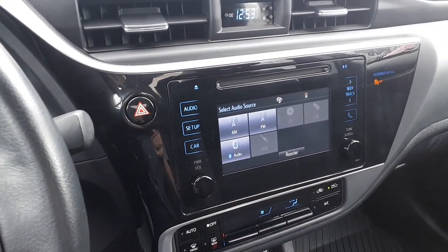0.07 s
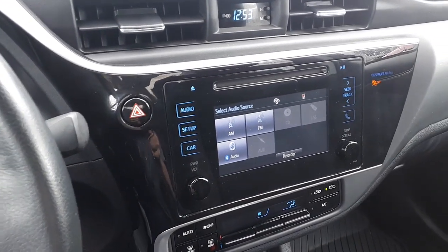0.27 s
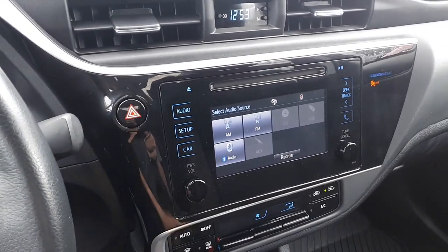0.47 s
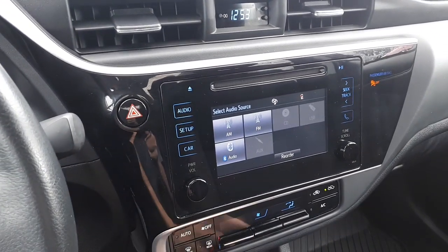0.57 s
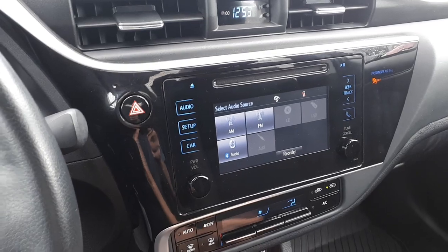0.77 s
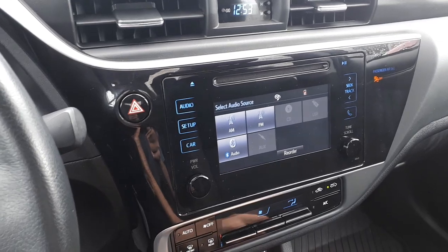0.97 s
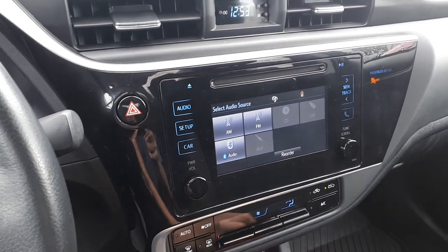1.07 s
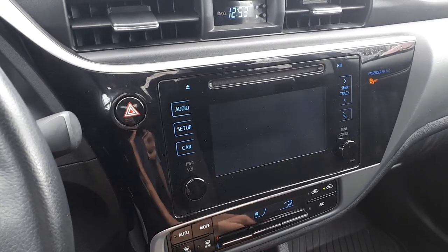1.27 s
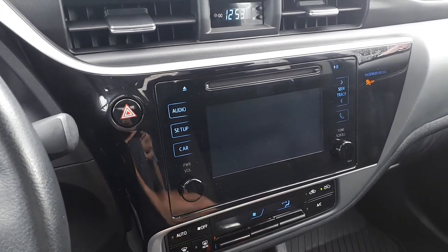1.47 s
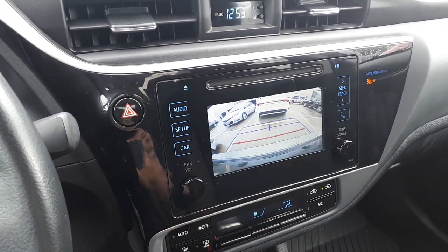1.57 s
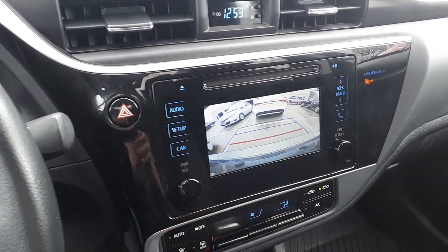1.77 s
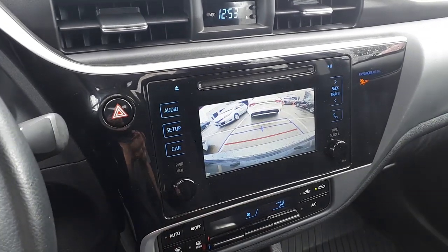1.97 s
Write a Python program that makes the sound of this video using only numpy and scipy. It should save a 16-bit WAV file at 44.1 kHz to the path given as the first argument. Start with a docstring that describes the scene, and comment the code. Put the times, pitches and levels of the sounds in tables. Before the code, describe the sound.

A car gear lever is shifted in a small dry cabin, heard close in stereo over a faint, muffled engine idle. A slight swish and soft hand thump come around 0.6 seconds, a sharp click at 0.8, then uneven plastic scraping. A heavy clunk at 1.07 runs into a clatter and loud bright snap at 1.2. Small knocks and knob ticks near 1.35 follow, with a fading low shudder.

```python
"""Inside a parked car the engine idles as muffled noise, wavering tones, a pulsing whirr and a tone that dies away.
An arm reaches for the gear lever as a noise swish; the hand lands on it, the loose knob ticks and a first sharp
click has a bright treble edge. The lever leaves its notch with a thud and scrapes along the gate in uneven noise
and gliding squeaks; it drops into the next notch, the latch snaps home and the linkage settles over a low shudder.
Each contact strikes console, housing, detent and latch, built from decaying modes and dense noise bursts."""
import sys
import numpy as np
from scipy import signal
from scipy.fft import rfft, irfft, next_fast_len
from scipy.io import wavfile
from scipy.ndimage import map_coordinates

SR = 44100
rng = np.random.default_rng(int(sys.argv[2]) if len(sys.argv) > 2 else 0)


def transcribe(u):
    """Save the signal u as a 16-bit wav file named by the first command-line argument.

    u: samples, shape (n,) or (channels, n), limited to [-1, 1]; the rate is SR.
    q: integer samples, one column per channel.
    """
    v = np.clip(np.atleast_2d(u).T, -1, 1)
    q = np.round(v * 32767).astype(np.int16)
    wavfile.write(sys.argv[1], SR, q)


N = 89567  # length in samples


def amp(db):
    """Decibels to linear gain."""
    return 10 ** (np.asarray(db) / 20)


def unit(x):
    """Scale a sound to rms 1."""
    return x / np.sqrt(np.mean(x ** 2) + 1e-20)


def along(points, hz):
    """Read a curve of (frequency, value) points, interpolated on a log frequency axis."""
    f, v = np.transpose(points)
    return np.interp(np.log(hz + 1), np.log(f + 1), v)


def wobble(rate):
    """A smooth random curve with rate knots a second."""
    knots = rng.standard_normal(1024)
    return map_coordinates(knots, [np.arange(N) * rate / SR], mode="wrap")


# how alike left and right are, from near mono in the bass to slightly opposed on top:
# frequency_hz, correlation (1 = identical)
LIKENESS = [(50, 0.99), (300, 0.8), (600, 0.52), (1100, 0.18), (2500, 0), (15000, -0.27)]


def noise(colour, size):
    """Coloured stereo noise of rms 1, whose mid and side mix sets the left-right likeness."""
    hz = np.fft.rfftfreq(size, 1 / SR)
    turn = np.arccos(np.clip(along(LIKENESS, hz), -1, 1)) / 2
    phases = np.exp(2j * np.pi * rng.random((2, len(hz))))
    spread = [np.cos(turn), np.sin(turn)]
    mid, side = irfft(phases * amp(along(colour, hz)) * spread, size)
    return unit(np.array([mid + side, mid - side]))


def fade(t, attack_s, t60):
    """A quick rise times an exponential decay that loses 60 dB in t60 seconds."""
    return (1 - np.exp(-t / attack_s)) * np.exp(-np.log(1000) * t / t60)


def add(out, s, sound):
    """Mix a sound in at time s."""
    start = round(s * SR)
    out[:, start:start + sound.shape[1]] += sound[:, :N - start]


def ring(t, modes, attack_s, scatter):
    """Decaying modes of a part; scatter (radians) sets how differently they reach the two microphones."""
    phases = scatter * rng.standard_normal((len(modes), 2, 1))
    total = 0
    for (hz, db, t60), phase in zip(modes, phases):
        total = total + amp(db) * fade(t, attack_s, t60) * np.sin(2 * np.pi * hz * t + phase)
    return total / np.sqrt(sum(amp(db) ** 2 for _, db, _ in modes) / 2)


CABIN_T60, CABIN_RISE_S = 0.067, 0.013


def burst(t, colour, attack_s, t60, cabin_db):
    """Countless close modes dying together as noise, with the cabin's weaker, slower-rising tail."""
    direct = fade(t, attack_s, t60)
    tail = amp(cabin_db) * fade(t, CABIN_RISE_S, CABIN_T60)
    return noise(colour, len(t)) * np.hypot(direct, tail)


def filtered(x, response):
    """Shape x by a response of frequency, padded so that the end does not wrap onto the start."""
    m = next_fast_len(N + SR // 2)
    return irfft(rfft(x, m) * response(np.fft.rfftfreq(m, 1 / SR)), m)[..., :N]


# spectrum of the idle noise: frequency_hz, level_db
IDLE_COLOUR = [(15, -49.5), (25, -17.5), (64, -7.5), (97, -8), (130, -1), (180, -15), (223, -14.5),
               (309, -13), (335, -23), (550, -26), (840, -24), (911, -32), (1230, -41.5), (2050, -41),
               (3080, -47), (16000, -50)]
# steady engine and fan tones: pitch_hz, level_db
HUM_TONES = [(129.2, -69), (231.5, -72), (304, -70.5), (840, -76.5)]
IDLE_DB = -53.5
WHIRR_HZ, WHIRR_DB, WHIRR_DEPTH, TURNS_PER_S = 855, -74.5, .5, 12
FREE_HZ, FREE_DB, ENGAGE_S = 512, -68, 1.2  # the tone is gone when the gear engages


def idle():
    """The muffled engine and fan: rumble, wavering tones, a whirr pulsing once a turn and a dying tone."""
    t = np.arange(N) / SR
    tones = 0
    for hz, db in HUM_TONES:
        level = amp(db + 0.7 * wobble(1.6)) * np.sqrt(2)
        tones = tones + level * np.sin(2 * np.pi * hz * t + 0.37 * wobble(36))
    band = noise([(WHIRR_HZ / 2, -60), (WHIRR_HZ * .9, -12), (WHIRR_HZ, 0),
                  (WHIRR_HZ * 1.2, -40), (WHIRR_HZ * 2, -80)], N)
    pulse = 1 + WHIRR_DEPTH * np.sin(2 * np.pi * TURNS_PER_S * t + 2.1 * wobble(3.2))
    whirr = amp(WHIRR_DB) * pulse * band
    dying = np.sqrt(np.clip(1 - (t / ENGAGE_S) ** 2, 0, 1))
    free = amp(FREE_DB) * dying * np.sin(2 * np.pi * FREE_HZ * t + wobble(4.3))
    return amp(IDLE_DB) * noise(IDLE_COLOUR, N) + tones + free + whirr


# dense ring of the console, also used for the lever's thuds: frequency_hz, level_db
THUD_SPECTRUM = [(40, -16.5), (75, -9.5), (125, -5.5), (180, -9.5), (300, -5), (420, -18.5), (700, -27.5),
                 (2000, -51.5)]
SHUDDER_S, SHUDDER_RISE_S, SHUDDER_T60 = 1.1, 0.13, 0.74
SHUDDER_DB = -26.5  # before the rise and decay


def shudder():
    """The console goes on rumbling as the linkage settles: low noise that swells and decays."""
    t = np.maximum(np.arange(N) / SR - SHUDDER_S, 0)
    return amp(SHUDDER_DB) * fade(t, SHUDDER_RISE_S, SHUDDER_T60) * noise(THUD_SPECTRUM, N)


# spectrum of the sleeve's swish: frequency_hz, level_db
SLEEVE_SPECTRUM = [(500, 10), (2000, 4.5), (4000, 0.5), (6800, 8), (9000, 1.5)]
SLEEVE_S, SLEEVE_WIDTH_S, SLEEVE_DB = 0.56, 0.13, -63  # peak time, half-width at 1/e, peak level


def sleeve():
    """A soft noise swish swells and fades as the arm slides toward the lever."""
    swell = np.exp(-((np.arange(N) / SR - SLEEVE_S) / SLEEVE_WIDTH_S) ** 2)
    return amp(SLEEVE_DB) * swell * noise(SLEEVE_SPECTRUM, N)


# rubbing of the grip and the mechanism, a level curve: time_s, level_db
RUB_LEVEL = [(0.631, -92), (0.65, -56), (0.672, -70.5), (0.794, -51.5), (0.86, -46.5), (.92, -68),
             (0.998, -71), (1.04, -49), (1.1, -45), (1.144, -42.5), (1.185, -60), (1.251, -64)]
# spectrum of the rubbing: frequency_hz, level_db
RUB_SPECTRUM = [(100, -9.5), (300, 8), (800, -0.5), (1500, -10.5), (3500, -17), (9000, -31)]
# brief squeaks and rings of the plastic under load: start_s, length_s, pitch_hz, level_db
PLASTIC_SQUEAKS = [(1.0588, 0.025, 1029, -32), (1.063, 0.016, 7450, -44.5), (1.257, 0.042, 1730, -55)]
SQUEAK_RISE_HZ_PER_S, SQUEAK_JITTER, SQUEAK_ROUGH_DB = 1800, .035, 4  # jitter as a fraction of pitch


def scrape():
    """Plastic rubs unevenly along the gate and gives brief, rough squeaks with a rising glide."""
    level_db = np.interp(np.arange(N) / SR, *np.transpose(RUB_LEVEL), left=-120, right=-120)
    out = amp(level_db + 2.8 * wobble(170)) * noise(RUB_SPECTRUM, N)
    for s, length, hz, db in PLASTIC_SQUEAKS:
        count = int(length * SR)
        slip = np.array([wobble(1000) for _ in range(2)])[:, :count]  # each side slips on its own
        glide = SQUEAK_RISE_HZ_PER_S * (np.arange(count) / SR - length / 2)
        pitch = hz * (1 + SQUEAK_JITTER * slip) + glide
        swell = np.sin(np.pi * np.arange(count) / count)
        level = amp(db + SQUEAK_ROUGH_DB * wobble(520)[:count]) * swell
        add(out, s, level * np.sqrt(2) * np.sin(2 * np.pi * np.cumsum(pitch, axis=1) / SR))
    return out


# bright, dry treble edge of the first sharp click: start_s, level_db
CLICK_EDGES = [(0.8147, -35.5)]
# spectrum of the edge: frequency_hz, level_db
EDGE_SPECTRUM = [(5000, -34), (10000, -11), (13500, -1), (16000, 6.5)]


def click_edge():
    """The bright, dry treble edge of the first sharp click: a noise burst with a faint cabin tail."""
    out, t = np.zeros((2, N)), np.arange(SR // 2) / SR
    for s, db in CLICK_EDGES:
        add(out, s, amp(db) * burst(t, EDGE_SPECTRUM, attack_s=0.00045, t60=0.078, cabin_db=-29))
    return out


# ticks of the loose knob: start_s, level_db
KNOB_TICKS = [(0.746, -75), (1.3597, -49.5), (1.376, -61), (1.65, -74)]
# modes of the knob: pitch_hz, level_db
KNOB_MODES = [(1700, -3), (2170, -3), (2520, 2), (3430, -5), (4150, -5)]
# dense ring of the detent, also used for the knob: frequency_hz, level_db
CLACK_SPECTRUM = [(600, -25), (1400, -3.5), (2500, -2.5), (3600, -5.5), (5000, -14.5), (7400, -17.5),
                  (8200, -31), (16000, -44)]
KNOB_T60 = 0.096  # s


def rattle():
    """The loose plastic knob ticks and rings, dulled, under the hand and as the lever comes to rest."""
    out, t = np.zeros((2, N)), np.arange(SR // 2) / SR
    knob = [(hz, db, KNOB_T60) for hz, db in KNOB_MODES]
    dull = signal.butter(6, 4700, fs=SR, output="sos")
    for s, db in KNOB_TICKS:
        tick = (ring(t, knob, attack_s=0.00082, scatter=0.62)
                + burst(t, CLACK_SPECTRUM, attack_s=0.00087, t60=KNOB_T60, cabin_db=-45))
        add(out, s, amp(db) * tick)
    return signal.sosfilt(dull, out)


# contacts of the mechanism, with the console's thud, the housing's knock, the detent's clack and
# the latch's snap: start_s, thud_level_db, knock_level_db, clack_level_db, snap_level_db
LEVER_CONTACTS = [ (0.655, -27, -52, -84, -74), (0.8131, -28.5, -36.5, -45, -38),
                  (0.835, -37.5, -45, -59, -59), (1.004, -31.5, -47, -48, -61),
                  (1.0603, -48.5, -33, -33, -39.5), (1.0696, -12.5, -25, -32.5, -52),
                  (1.079, -23, -34, -52, -58), (1.097, -31, -54.5, -56.5, -69),
                  (1.1115, -52.5, -48, -43, -50), (1.154, -36, -25, -32.5, -53),
                  (1.18, -23.5, -32.5, -40, -60.5), (1.196, -33.5, -27.5, -22, -21.5),
                  (1.2008, -36.5, -26.5, -28, -19.5), (1.212, -27.5, -23, -27, -54),
                  (1.225, -25, -34, -47.5, -64), (1.33, -34, -47.5, -79, -58.5),
                  (1.358, -56.5, -40, -72.5, -57.5), (1.388, -36, -48.5, -66, -69)]
# modes of the console: pitch_hz, level_db, t60_s
CONSOLE_MODES = [(137.8, -10, 0.17), (196.4, -9, 0.075), (238, -3, 0.08), (285, 0.5, 0.065),
                 (332, 3, 0.043), (420, -13, 0.099)]
# modes of the housing: pitch_hz, level_db, t60_s
HOUSING_MODES = [(466, -6, 0.18), (588, -2.5, 0.027), (661, -4, 0.063), (736, -2.5, 0.097), (801, -2, 0.07),
                 (883, -6.5, 0.12), (1158, -12.5, 0.1), (1392, -15.5, 0.074)]
# modes of the detent: pitch_hz, level_db
DETENT_MODES = [(1679, -3), (1833, -5), (2408, -4), (2877, -4), (3075, -4), (3588, 0), (3666, -2),
                (4097, -6), (5122, -7)]
# dense ring of the housing: frequency_hz, level_db
KNOCK_SPECTRUM = [(150, -22.5), (350, 4), (520, 3.5), (760, 0.5), (1050, -4), (1400, -12), (2500, -15.5),
                  (7000, -39)]
# dense ring of the latch: frequency_hz, level_db
SNAP_SPECTRUM = [(1500, -14), (4000, 3), (5600, -0.5), (7300, 1), (8100, -4.5), (9000, -3.5), (11000, -3),
                 (13500, -5.5), (16000, -5.5)]
THUD_RING_DB, THUD_DENSE_DB, THUD_ATTACK_S, THUD_T60 = 2, -8, .0022, .085
HOUSING_RING_DB, HOUSING_DENSE_DB = 1.5, -3.5
KNOCK_T60, CLACK_T60, SNAP_T60, DETENT_T60 = 0.15, 0.08, 0.05, 0.06  # s
PADDING_HZ = 480  # padded contact dulls the thud


def lever():
    """Every contact rings console, housing, detent and latch, each with its own strength."""
    out, t = np.zeros((2, N)), np.arange(SR // 2) / SR
    padding = signal.butter(3, PADDING_HZ, fs=SR, output="sos")
    detent = [(hz, db, DETENT_T60) for hz, db in DETENT_MODES]
    for s, thud_db, knock_db, clack_db, snap_db in LEVER_CONTACTS:
        thud_dense = burst(t, THUD_SPECTRUM, THUD_ATTACK_S, THUD_T60, cabin_db=-9.0)
        thud_ring = ring(t, CONSOLE_MODES, THUD_ATTACK_S, scatter=.2)
        thud = amp(THUD_DENSE_DB) * thud_dense - amp(THUD_RING_DB) * thud_ring
        knock_ring = ring(t, HOUSING_MODES, attack_s=0.001, scatter=.9)
        knock_dense = burst(t, KNOCK_SPECTRUM, attack_s=0.002, t60=KNOCK_T60, cabin_db=-24.5)
        knock = amp(HOUSING_RING_DB) * knock_ring + amp(HOUSING_DENSE_DB) * knock_dense
        clack = (amp(-8) * ring(t, detent, attack_s=0.0032, scatter=2.9)
                 + burst(t, CLACK_SPECTRUM, attack_s=0.0013, t60=CLACK_T60, cabin_db=-51))
        snap = burst(t, SNAP_SPECTRUM, attack_s=0.00039, t60=SNAP_T60, cabin_db=-41.5)
        add(out, s, amp(thud_db) * signal.sosfilt(padding, thud) + amp(knock_db) * knock
            + amp(clack_db) * clack + amp(snap_db) * snap)
    return out


# stereo balance of the sounds at the lever: frequency_hz, left_minus_right_db
LEVER_BALANCE = [(150, 2), (2300, -0.5), (5500, 3), (7800, 0.5), (9300, -7), (12000, -8), (15500, -2)]
LOW_CUT_HZ = 62  # keeps the contacts free of boom
LEFT_LEAD_S = .00012


def scene():
    """Lever sounds reach the left first but their top treble favours the right; idle and shudder join unplaced."""
    sides = np.array([[1], [-1]])  # left, right
    low_cut = signal.butter(2, LOW_CUT_HZ, "high", fs=SR, output="sos")
    near = signal.sosfilt(low_cut, lever() + rattle() + click_edge() + scrape() + sleeve())

    def placing(hz):
        """Level and arrival-time difference between the two sides."""
        level = amp(sides * along(LEVER_BALANCE, hz) / 2)
        return level * np.exp(1j * np.pi * sides * hz * LEFT_LEAD_S)

    return filtered(near, placing) + shudder() + idle()


TOP_HZ = 15920


def record(dry):
    """The recorder's steep band limit removes the highest treble."""
    return filtered(dry, lambda hz: 1 / np.sqrt(1 + (hz / TOP_HZ) ** 240))


dry = scene()
out = record(dry)
transcribe(out)
```